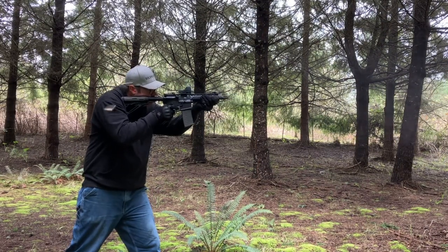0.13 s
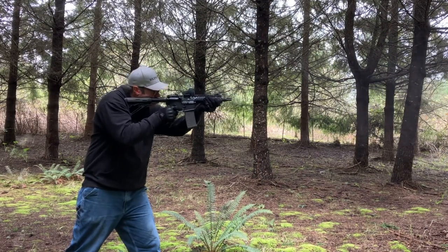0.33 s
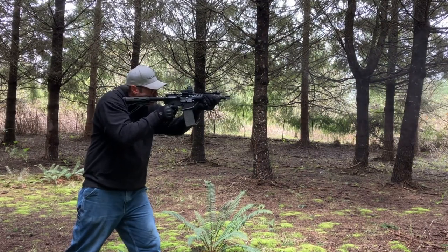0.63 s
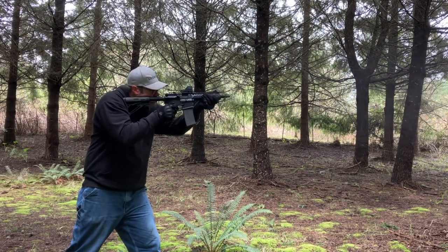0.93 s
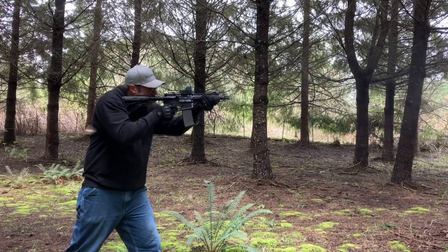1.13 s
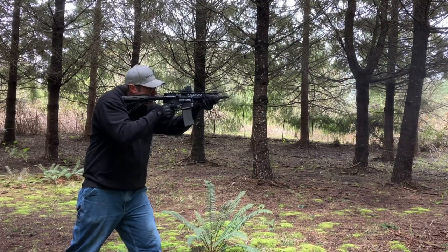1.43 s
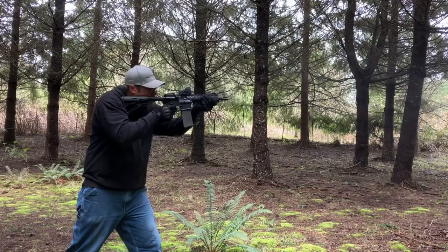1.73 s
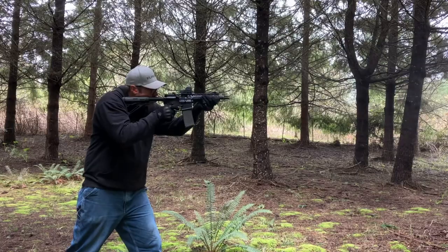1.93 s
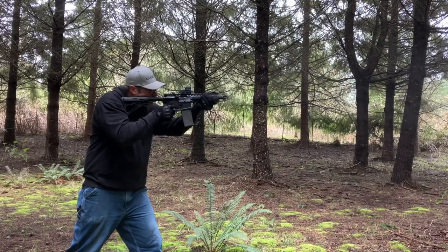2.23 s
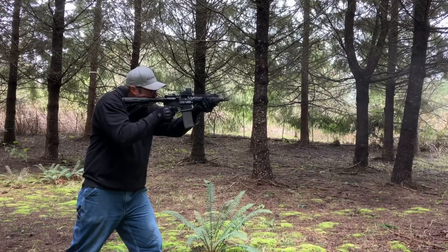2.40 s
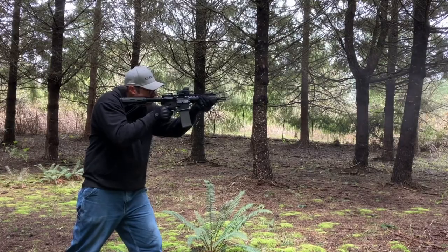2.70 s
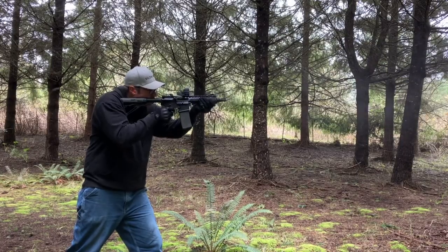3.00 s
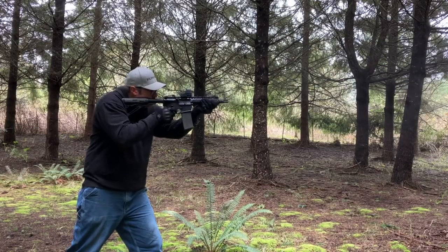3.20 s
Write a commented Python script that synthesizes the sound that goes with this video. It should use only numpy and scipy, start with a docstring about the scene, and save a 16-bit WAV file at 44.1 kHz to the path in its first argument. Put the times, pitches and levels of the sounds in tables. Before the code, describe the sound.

Suppressed rifle fires twenty-one quick single shots outdoors, each a muffled hissing pop with bolt clicks.

```python
"""Suppressed rifle in a fir wood

A suppressed rifle fires twenty-one quick single shots a few metres away, after the tail of an earlier one.
Each shot is a shaped burst of hiss, a short hollow ring of decaying modes, a low thump gliding down in pitch
and the bolt's clicks and clack. Short dull echoes and noise scattered by the trunks follow;
part of each noise is alike in all shots, and the wood rings on faintly."""
import sys
import numpy as np
from scipy.fft import rfft, irfft
from scipy.io import wavfile
from scipy.ndimage import uniform_filter1d

SR = 44100
rng = np.random.default_rng(int(sys.argv[2]) if len(sys.argv) > 2 else 0)


def wrap_up_sound(samples):
    """Save the sound to the file named by the first command line argument, as 16-bit audio."""
    columns = np.atleast_2d(samples).T
    # keep every value between -1 and 1, then stretch to whole-number steps
    tamed = np.clip(columns, -1, 1)
    steps = np.round(tamed * 32767).astype(np.int16)
    wavfile.write(sys.argv[1], SR, steps)


N = 147735
SIZE = 32768  # samples in one shot with its tail
AGE = np.arange(SIZE) / SR  # seconds since the shot
HZ = np.maximum(np.arange(SIZE // 2 + 1) * SR / SIZE, 1)
GAS_LAG_S = 0.00023  # left channel behind the right, for the ring and the puff
TONE_SCATTER_DB = 1.16  # shot-to-shot spread of each ring mode and echo


def from_db(db):
    """Decibels to gain."""
    return 10 ** (np.asarray(db) / 20)


def at_hz(points):
    """Read a table on a log-frequency axis."""
    hz, value = np.transpose(points)
    return np.interp(np.log(HZ), np.log(hz), value)


def ages(lag_s):
    """Time since the shot in the left and right channels, the left one late."""
    return np.maximum(AGE - np.array([[lag_s], [0]]), 0)


def swell(t, peak_s, steep):
    """A smooth rise to 1 and fall; steeper is narrower."""
    u = t / peak_s
    return (u * np.exp(1 - u)) ** steep


def grain():
    """Millisecond unevenness of spread about 1, clipped at 2."""
    lumps = uniform_filter1d(rng.standard_normal(SIZE), size=24)
    return np.clip(lumps / lumps.std(), -2, 2)


def fullness(hz, puff_db):
    """A shot with a loud puff is fuller in the bass, a weak one thinner: gain below a soft corner."""
    db_per_puff_db, corner_hz = 0.53, 300
    return from_db(db_per_puff_db * puff_db / (1 + (hz / corner_hz) ** 4))


def white():
    """Spectrum of stereo noise, most alike on both sides in bass and top, the left side late."""
    # stereo width: pitch_hz, left_right_likeness [0-1]
    likeness = [(50, 0.86), (300, 0.76), (700, 0.44), (1500, 0.083), (5500, 0.05), (7000, 0.36), (9000, 1)]
    lag_s, half_turn_hz = 0.000222, 6700
    mid, side = rfft(rng.standard_normal((2, SIZE)))
    alike = np.clip(at_hz(likeness), 0, 1)
    shared = np.sqrt((1 + alike) / 2) * mid
    apart = np.sqrt((1 - alike) / 2) * side
    # the left lag grows by up to half a turn more in the treble
    behind = 2 * np.pi * HZ * lag_s + np.pi * np.minimum(HZ / half_turn_hz, 1)
    return np.array([(shared + apart) * np.exp(-1j * behind), shared - apart])


def noises(colour, puffs_db):
    """One coloured noise per shot: partly the same each time, partly new."""
    # repetition: pitch_hz, share of the power alike in all shots [0-1]
    sameness = [(40, 0.48), (200, 0.21), (500, 0.6), (1500, 0.65), (3500, 0.22), (6000, 0.05), (12000, .05)]
    gain = from_db(at_hz(colour)) * HZ ** 2 / (HZ ** 2 + 20 ** 2)  # rumble below 20 Hz reduced
    gain = gain / np.sqrt(np.mean(gain ** 2))
    same = np.clip(at_hz(sameness), 0, 1)
    common = np.sqrt(same) * white()
    bursts = []
    for puff_db in puffs_db:
        fresh = np.sqrt(1 - same) * white()
        bursts.append(irfft(gain * fullness(HZ, puff_db) * (common + fresh)))
    return np.array(bursts)


def wood(puffs_db):
    """Grainy scatter from the near trunks, then a smooth, duller tail from far off."""
    # near trunks' tone: pitch_hz, level_db
    near_colour = [(25, -16), (55, -4.5), (150, -2.5), (300, -4), (650, 3.5), (1100, -4), (2200, -6),
                   (3800, -6.5), (5200, -12.5), (7500, -10.5), (11000, -16.5), (16000, -26.5)]
    # far wood's tone: pitch_hz, level_db
    far_colour = [(25, -35.5), (70, -15), (150, 1.5), (230, 1.5), (350, -1.5), (650, -0.5), (1300, -6.5),
                  (2800, -4.5), (5000, -11), (7500, -14), (11000, -25.5), (16000, -38)]
    near_db, near_rise_s, near_t60_s, near_grain_db = -20.5, 0.0066, 0.32, 2
    far_db, far_rise_s, far_t60_s = -32, 0.047, 0.99
    near_fall = from_db(near_db - 60 * AGE / near_t60_s + near_grain_db * grain())
    near = near_fall * (1 - np.exp(-AGE / near_rise_s))
    far_fall = from_db(far_db - 60 * AGE / far_t60_s)
    far = far_fall * (1 - np.exp(-AGE / far_rise_s))
    return near * noises(near_colour, puffs_db) + far * noises(far_colour, puffs_db)


def knocks(puff_db):
    """Short dull echoes, tone pulses that follow every report at the same delays."""
    # echoes: delay_s, pitch_hz, half_length_s, level_db
    echoes = [(0.0239, 289, 0.0027, -24), (0.042, 480, 0.0045, -33), (0.055, 360, 0.0018, -22.5),
              (0.063, 267.7, .006, -40.5), (0.104, 228, 0.0048, -32.5)]
    lag_s = 0.00034
    out = 0
    for delay_s, hz, half_s, db in echoes:
        t = ages(lag_s) - delay_s
        level = from_db(db + TONE_SCATTER_DB * rng.normal()) * fullness(hz, puff_db)
        pulse = np.exp(-(t / half_s) ** 2 / 2)
        out = out + level * pulse * np.cos(2 * np.pi * hz * t)
    return out


def bolt(puffs_db):
    """The bolt hits its rear stop and slams home: two clicks of fast-decaying noise."""
    # clicks: delay_s, level_db
    clicks = [(0.0187, -18), (0.0433, -23)]
    # metal tone: pitch_hz, level_db
    colour = [(300, -8), (1100, 9.5), (3500, -9.5), (8000, -21), (16000, -28)]
    decay_s = 0.00091
    shape = 0
    for delay_s, db in clicks:
        shape = shape + from_db(db) * (AGE > delay_s) * np.exp(-np.abs(AGE - delay_s) / decay_s)
    return shape * noises(colour, puffs_db)


def clack():
    """A few cycles of hollow knock, falling in pitch, as the bolt carrier meets the buffer."""
    level_db, centre_hz, sag_hz_per_s = -14.5, 766.7, 47000
    delay_s, half_s, lag_s = 0.0214, 0.0019, 0.00027
    t = ages(lag_s) - delay_s
    pulse = np.exp(-(t / half_s) ** 2 / 2)
    turns = (centre_hz - sag_hz_per_s * t / 2) * t
    return from_db(level_db) * pulse * np.cos(2 * np.pi * turns)


def puff(puff_db):
    """A low thump under each shot, its pitch gliding down."""
    base_db, steep = -30, 7.4
    start_hz, end_hz, glide_s = 219, 26.6, 0.024
    peak_s = 0.024 + 0.0002 * puff_db  # a louder puff swells for longer
    t = ages(GAS_LAG_S)
    hz = end_hz + (start_hz - end_hz) * np.exp(-t / glide_s)
    pitch = 1 + 0.045 * rng.normal()
    turns = np.cumsum(hz, axis=1) / SR * pitch
    return from_db(base_db + puff_db) * swell(t, peak_s, steep) * np.sin(2 * np.pi * turns)


def suppressor(puff_db):
    """Gas surges through the can and sounds its hollow modes for a few cycles."""
    # hollow modes: pitch_hz, level_db
    ring = [(255, -18), (380, -12), (645, -14.5), (800, -33.5), (955, -17.5), (1258, -19.5), (1530, -21),
            (1880, -25)]
    peak_s, steep, phase_delay_s = 0.00566, 2.3, 0.00024
    t = ages(GAS_LAG_S)
    pitch = 1 + 0.016 * rng.normal()
    modes = 0
    for hz, db in ring:
        level = from_db(db + TONE_SCATTER_DB * rng.normal()) * fullness(hz, puff_db)
        modes = modes + level * np.sin(2 * np.pi * hz * pitch * (t - phase_delay_s))
    return modes * swell(t, peak_s, steep)


def crack(puffs_db):
    """Gas escaping at the muzzle: a ragged burst of hiss, held briefly, then dying away."""
    # hiss tone: pitch_hz, level_db
    colour = [(30, -27), (150, -2.5), (350, 0), (900, 2.5), (1500, 1), (2600, -6), (5500, -10.5),
              (7500, -8.5), (11000, -11.5), (16000, -17.5)]
    level_db, grain_db = -16, 2
    attack_s, hold_s, decay_s = 0.00054, 0.0051, 0.0065
    attack = np.minimum(AGE / attack_s, 1)
    decay = np.exp(-np.maximum(AGE - hold_s, 0) / decay_s)
    return from_db(level_db + grain_db * grain()) * attack * decay * noises(colour, puffs_db)


def add(out, sound, s):
    """Mix a sound in at time s, dropping what lies outside the scene."""
    start = int(s * SR)
    first, last = max(start, 0), min(start + SIZE, N)
    out[:, first:last] += sound[:, first - start:last - start]


def scene():
    """All shots with their echoes."""
    # shots: start_s, tone_db (ring and echoes), puff_db, noise_db (crack, bolt, clack and wood)
    shot_list = [(0.0341, -0.8, 14, 1), (0.2403, -0.5, 8, 1.1), (0.4292, 0.8, 8.5, 1.35),
                 (0.5289, -1.3, 9, 0.46), (0.7232, -1.8, -1, 0.1), (0.8623, -1, 4, 0.11),
                 (0.9756, -1, 6.5, -0.3), (1.1623, 0.9, -0.5, 0.3), (1.3055, -1.3, 7.5, 0),
                 (1.4791, -0.9, 1, -0.2), (1.5809, -1.0, -3.6, 0), (1.7775, -1.2, -5, 0.0),
                 (2.0101, -7.5, -4.5, 0.5), (2.1567, -2.4, -3, 0.28), (2.3274, -2.2, 5.6, 0),
                 (2.4403, -0.5, 6.3, 0.1), (2.5538, 1.8, 4.5, 0), (2.6583, 1.0, 2, 0.1),
                 (2.7503, -0.52, 1.5, 0), (2.8654, -1, -3, 0.15), (2.9961, -6.5, 1.5, 0.6)]
    # a shot before the start, only its tail is heard; same columns
    earlier_shot = (-0.21, -0.5, 0, 11)
    shots = np.array([earlier_shot, *shot_list])
    out, puffs_db = np.zeros((2, N)), shots[:, 2]
    hisses = crack(puffs_db) + bolt(puffs_db) + wood(puffs_db)
    for (start_s, tone_db, puff_db, noise_db), hiss in zip(shots, hisses):
        tones = from_db(tone_db) * (suppressor(puff_db) + knocks(puff_db))
        clatter = from_db(noise_db) * (hiss + clack())
        add(out, tones + puff(puff_db) + clatter, start_s)
    return out


def record(dry):
    """Peaks are rounded towards 0.9, and the treble is cut steeply."""
    cutoff_hz = 15800
    rounded = dry / (1 + (dry / 0.9) ** 6) ** (1 / 6)
    hz = np.arange(N + 1) * SR / (2 * N)
    treble_cut = 1 / (1 + (hz / cutoff_hz) ** 200)
    return irfft(rfft(rounded, 2 * N) * treble_cut)[:, :N]


dry = scene()
out = record(dry)
wrap_up_sound(out)
```